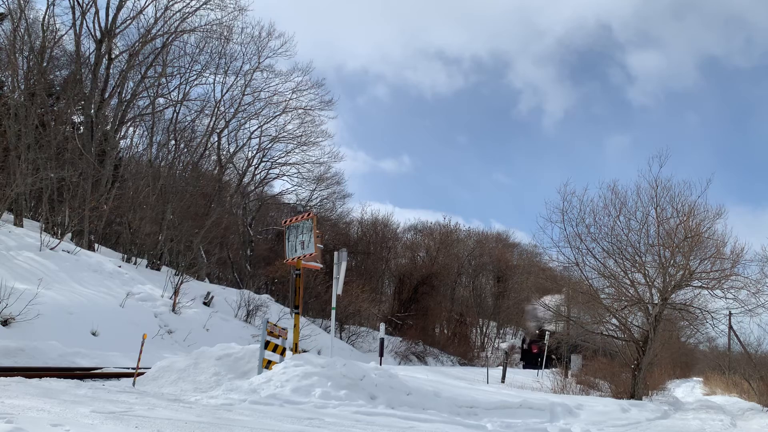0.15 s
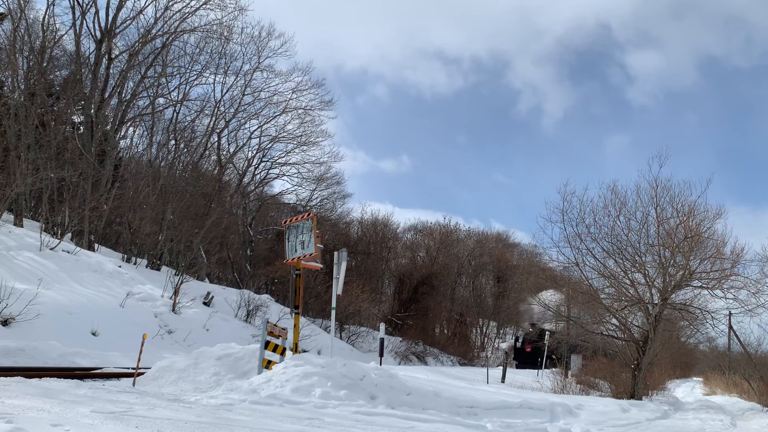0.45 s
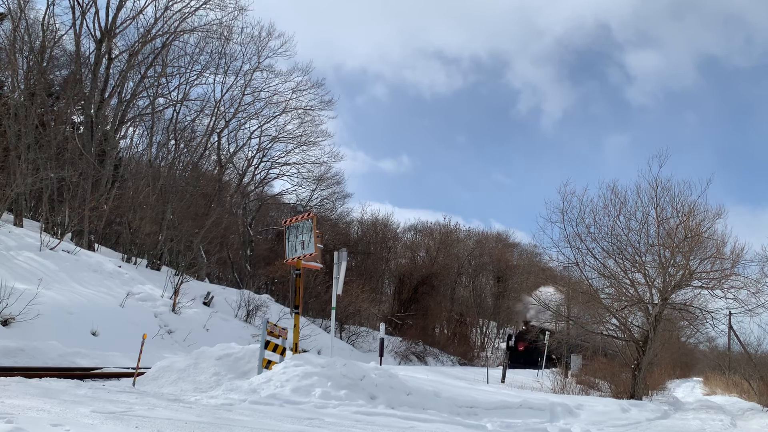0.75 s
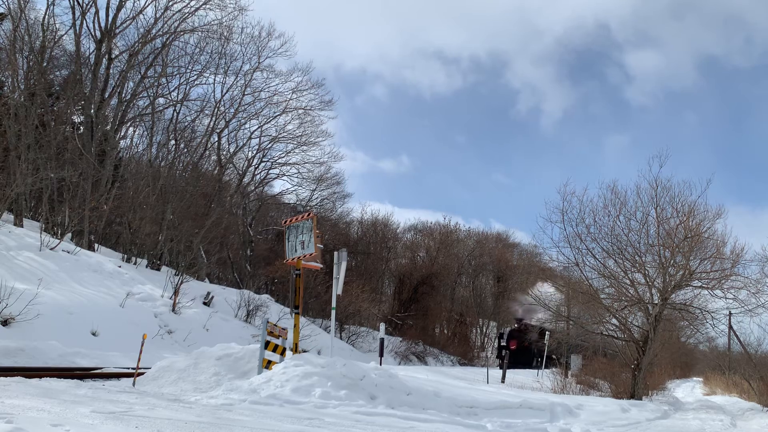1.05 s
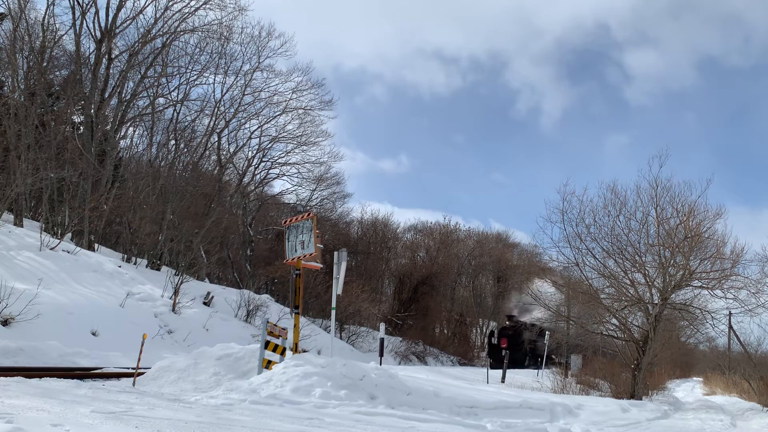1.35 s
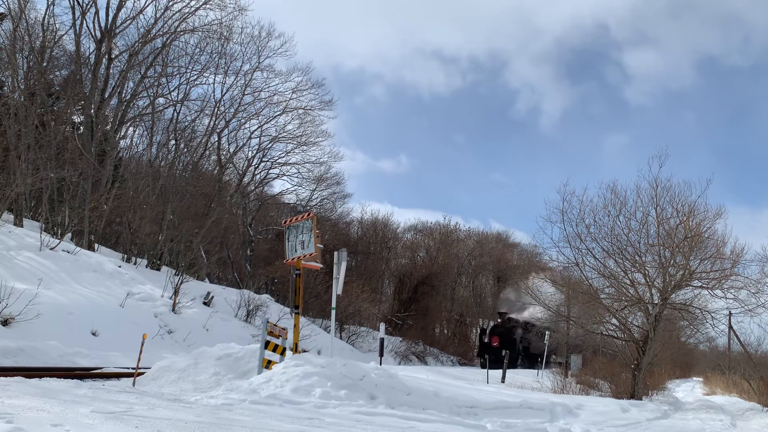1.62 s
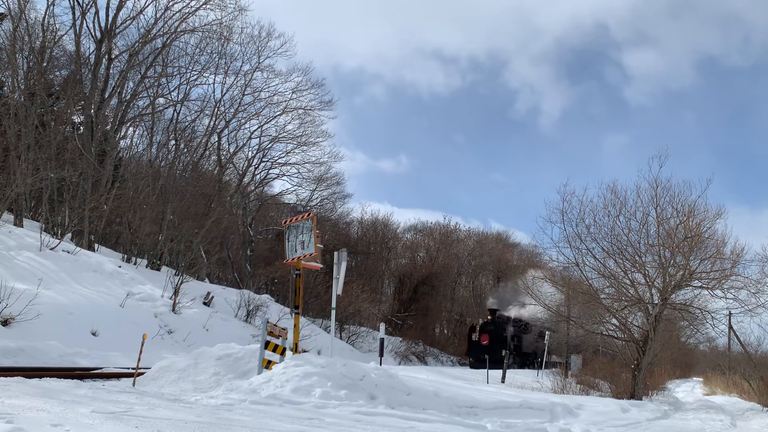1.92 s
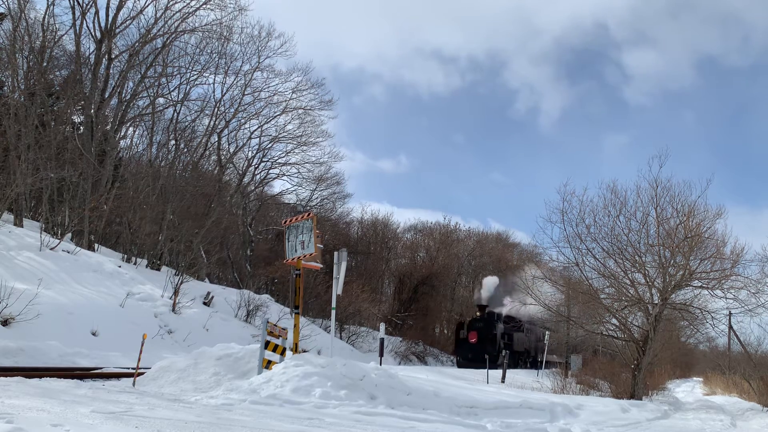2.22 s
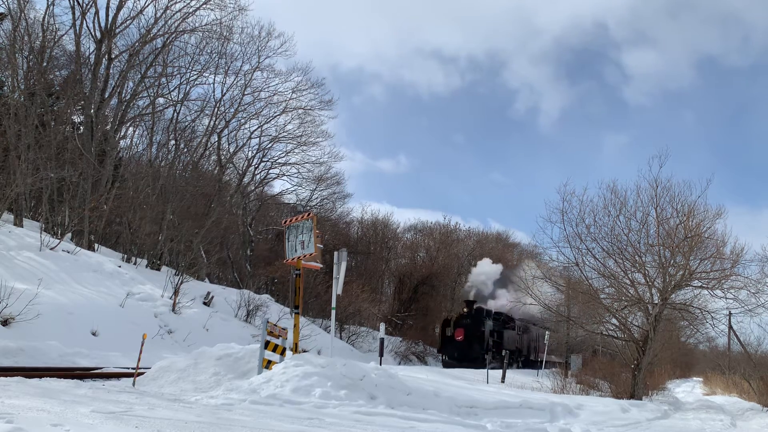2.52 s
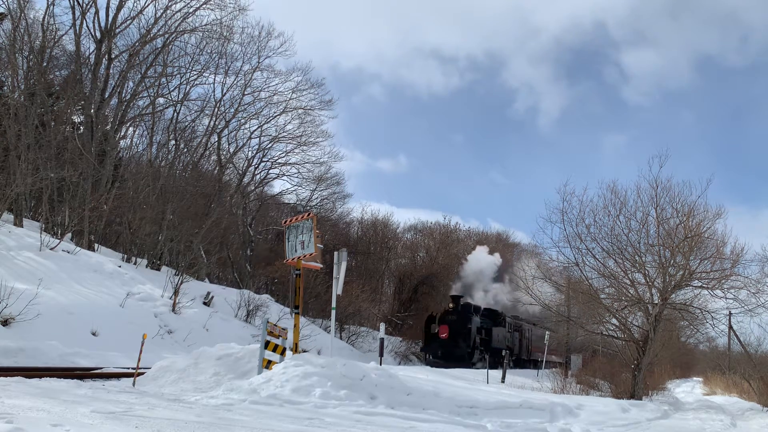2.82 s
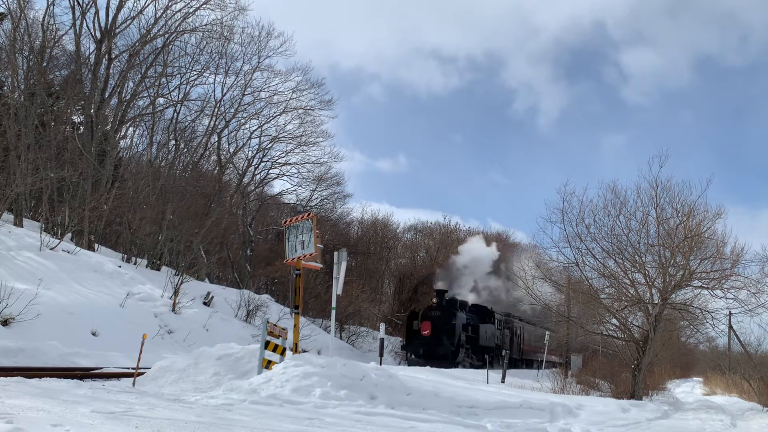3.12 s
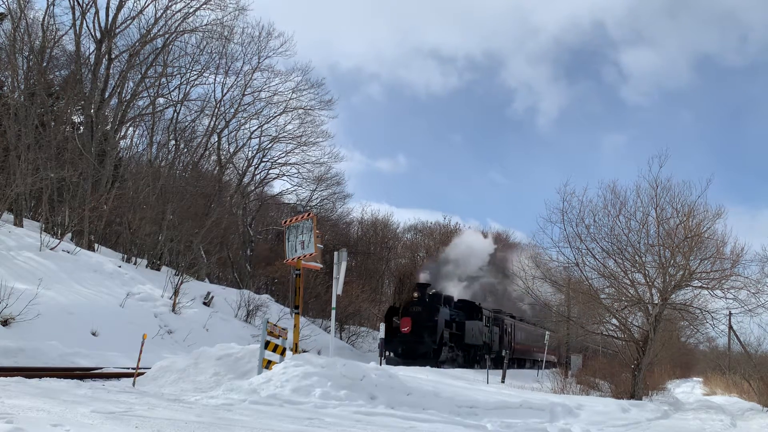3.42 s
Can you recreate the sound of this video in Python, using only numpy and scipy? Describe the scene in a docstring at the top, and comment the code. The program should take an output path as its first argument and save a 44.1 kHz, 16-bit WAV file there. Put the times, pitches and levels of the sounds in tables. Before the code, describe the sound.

A steam locomotive nears in an open snowy valley. Faint exhaust, low hum and weak thumps come first; just before two seconds steam bursts up, then deep uneven chuffs follow, heard from a fixed stereo microphone at a distance.

```python
"""A steam locomotive draws near across snow, heard through two microphone ports.
First the exhaust, steam leaks and rolling wheels are faint noise bands over a low hum, with weak thumps.
Just before two seconds the steam jet leaps up and the exhaust grows louder.
From then on its beats come as deep thumps: short tone bursts of sinking pitch amid swells of resonant noise.
Roar, hiss, rolling and murmur are random spectra, each shaped by a colour and a level curve."""
import sys
import numpy as np
from scipy import signal
from scipy.io import wavfile
from scipy.ndimage import uniform_filter1d

SR = 44100
rng = np.random.default_rng(int(sys.argv[2]) if len(sys.argv) > 2 else 0)


def digitize_waveform(pressure):
    """Quantize a signal to 16-bit integers and store it at the path in sys.argv[1].

    Rows of a 2-D input are taken as channels; values are limited to [-1, 1].
    """
    field = np.atleast_2d(pressure).T
    bounded = np.clip(field, -1, 1)
    quanta = np.round(bounded * 32767).astype(np.int16)
    wavfile.write(sys.argv[1], SR, quanta)


def decibels_to_gain(level_db):
    """Convert a level in decibels to a linear amplitude gain (20 dB per decade)."""
    exponent = np.asarray(level_db, float) / 20
    return 10 ** exponent


N = 156996


def evened(x):
    """Normalisation: scales a signal to an rms of 1."""
    return x / np.sqrt(np.mean(x ** 2) + 1e-20)


def read_spectrum(points, hz):
    """Spectral interpolation: reads a curve on a logarithmic frequency axis."""
    f, value = np.transpose(points)
    return np.interp(np.log(hz + 1), np.log(f + 1), value)


def follow(curve):
    """Amplitude envelope: turns a dB curve into a gain for every sample."""
    s, db = np.transpose(curve)
    return decibels_to_gain(np.interp(np.arange(N) / SR, s, db))


def smoothed(field, bins, frames):
    """Correlated randomness: averages a random field over frequency bins and time frames, to rms 1."""
    across_bins = uniform_filter1d(field, size=bins, axis=0)
    return evened(uniform_filter1d(across_bins, size=frames, axis=1))


# Coherence of the two ports: [f/Hz, likeness 0-1]
PORT_LIKENESS = [(40, 1), (70, 0.93), (100, 1), (150, 0.65), (250, 0.26), (330, 1), (420, 0.89),
                 (650, 0.82), (870, 0.46), (1200, 0.62), (1800, 0.76), (2250, 0.74), (2600, 0.25),
                 (3200, 1), (3900, 0.34), (4600, 0.53), (5300, 0.88), (6400, 0.15), (7200, 0.36),
                 (8000, 0.1), (8600, 0.8), (15000, 1)]
# Phase difference of the ports: [f/Hz, lead of the left port/rad]
PORT_LEAD = [(60, 0), (200, 1.3), (250, 2.6), (265, -2.2), (310, -.9), (420, 0), (870, .4), (1200, -.8),
             (2300, -.6), (3270, -1.7), (4100, -.8), (4650, -1.8), (5340, -2.7), (6030, -3.2), (6720, -4.5),
             (7200, -6.6), (7750, -8.3), (8600, -9.42), (15000, -22)]
# Level difference of the ports: [f/Hz, left minus right/dB]
PORT_TILT = [(60, 0), (350, -2), (600, 0), (870, 2), (1200, 0), (1900, 0), (2600, 6), (3300, 4), (3700, 0),
             (4700, 1), (6000, -4), (7100, 2), (8400, 0), (15000, 0)]


def noise(colour, size, patchy_db, gusty_db, raspy_db):
    """Partly coherent noise: random short-time spectra with drifting patches, gusts and narrow rasps."""
    hop = size // 4
    frames, hz = N // hop + 5, np.fft.rfftfreq(size, 1 / SR)
    a, b, c, d, patches, rasps = rng.standard_normal((frames, len(hz), 6)).T
    patches = smoothed(patches, bins=10, frames=8)
    rasps = smoothed(rasps, bins=2, frames=12)
    gusts = evened(uniform_filter1d(rng.standard_normal(frames), size=6))  # shared by all frequencies

    same = np.clip(read_spectrum(PORT_LIKENESS, hz), 0, 1)[:, None]
    one, other = a + 1j * b, c + 1j * d
    spectra = np.array([one, same * one + np.sqrt(1 - same ** 2) * other])

    # each port takes half of the level and phase difference
    lead = np.interp(hz, *np.transpose(PORT_LEAD))
    left = decibels_to_gain(read_spectrum(PORT_TILT, hz) / 2) * np.exp(.5j * lead)
    spectra *= np.array([left, 1 / left])[:, :, None]

    unevenness = patchy_db * patches + gusty_db * gusts + raspy_db * rasps
    spectra *= decibels_to_gain(read_spectrum(colour, hz)[:, None] + unevenness)
    return evened(signal.istft(spectra, nperseg=size, noverlap=size - hop)[1][:, :N])


def bell(t, width):
    """Asymmetric Gaussian envelope: a swell that rises faster than it dies."""
    tail = 1.24  # stretches the fall and shortens the rise
    return .5 ** ((2 * t / (width * np.where(t > 0, tail, 1 / tail))) ** 2)


def bursts(rows):
    """Tone-burst principle: a few cycles of linearly sinking pitch under one swell."""
    sag_hz_per_s, tilt_db = 200, 2  # pitch lost per second, left minus right
    out = np.zeros(N)
    for (s, db, hz, width), turn in zip(rows, rng.random(len(rows))):
        since = np.arange(N) / SR - s
        t = np.clip(since, -.12, .12)  # keeps the sweep near its centre
        cycles = t * (hz - sag_hz_per_s * t / 2) + turn
        out += decibels_to_gain(db) * bell(since, width) * np.cos(2 * np.pi * cycles)
    return out * decibels_to_gain(tilt_db / 2 * np.array([[1], [-1]]))


# Level of the open-air murmur: [t/s, level/dB]
MURMUR_LEVEL = [(0, -56.5), (.8, -56.5), (1.8, -54.5), (2.3, -61), (2.8, -55), (3.1, -48), (3.56, -52.5)]
# Relative power density of the murmur: [f/Hz, density/dB]
MURMUR_COLOUR = [(60, -30), (130, -8.5), (220, 0), (320, -12), (600, -35), (1000, -23), (3000, -56)]


def air():
    """Ambient noise: a low broadband murmur of the open valley."""
    return follow(MURMUR_LEVEL) * noise(MURMUR_COLOUR, size=2048, patchy_db=1.0, gusty_db=0.3, raspy_db=1.5)


# Rms level of the hum before its waver: [t/s, level/dB]
HUM_LEVEL = [(0, -36.5), (.6, -33.5), (.8, -38), (1.04, -36.5), (1.13, -35), (1.155, -29), (1.19, -34),
             (1.6, -33), (2.2, -30), (2.9, -32), (3.3, -29.5), (3.56, -30.5)]


def hum():
    """Amplitude modulation: one low tone of constant pitch, wavering slightly in level."""
    pitch_hz, lead_rad, waver_db = 95.04, 0.59, 0.8  # the left port leads; the waver is an rms
    t = np.arange(N) / SR
    waver = evened(sum(np.sin(2 * np.pi * (f * t + rng.random())) for f in np.geomspace(1, 9, num=12)))
    phase = 2 * np.pi * (pitch_hz * t + rng.random()) + lead_rad / 2 * np.array([[1], [-1]])
    return np.sqrt(2) * follow(HUM_LEVEL) * decibels_to_gain(waver_db * waver) * np.sin(phase)


# Level of the ground rumble of the train: [t/s, level/dB]
RUMBLE_LEVEL = [(0, -38.5), (.3, -49.5), (.7, -43), (.87, -46), (1.0, -40.5), (1.2, -42), (1.3, -47),
                (1.6, -38.5), (1.93, -43.5), (2.0, -42), (2.2, -36), (2.36, -38.5), (2.6, -34.5),
                (2.95, -36), (3.25, -39), (3.56, -33)]
# Relative power density of the rumble: [f/Hz, density/dB]
RUMBLE_COLOUR = [(15, -39), (33, -18), (42, -0.5), (62, 1), (76, -1), (95, -11), (120, 0), (135, -18.5),
                 (170, -25.5), (300, -45.5)]


def ground_rumble():
    """Ground-borne vibration: low-frequency noise of the train's rumble."""
    return follow(RUMBLE_LEVEL) * noise(RUMBLE_COLOUR, size=2048, patchy_db=0.2, gusty_db=1.0, raspy_db=0.0)


# Level of the wheels on the rails, before a 0.3 dB lift: [t/s, level/dB]
ROLLING_LEVEL = [(0.0, -45.5), (0.07, -47), (0.21, -51.5), (0.23, -48.5), (0.8, -53.5), (1.23, -49),
                 (1.45, -54.5), (1.61, -49), (1.66, -53.5), (1.94, -54), (1.96, -46), (2.14, -55),
                 (2.17, -44), (2.84, -44), (2.85, -43.5), (2.99, -50), (3.03, -43.5), (3.37, -50.5),
                 (3.53, -46), (3.56, -45)]
# Relative power density of the rail noise: [f/Hz, density/dB]
RAIL_COLOUR = [(200, -58), (300, -13.5), (410, -7.5), (480, -4), (600, -3), (670, 0), (740, -7.5),
               (900, -9), (1500, -44)]


def wheels():
    """Rolling contact noise: wheels sound in the rails as a mid-frequency noise band."""
    rails = noise(RAIL_COLOUR, size=1024, patchy_db=1.0, gusty_db=0.56, raspy_db=1.0)
    return decibels_to_gain(0.3) * follow(ROLLING_LEVEL) * rails


# Level of the thinnest, highest hiss, before a 3.5 dB lift: [t/s, level/dB]
SIZZLE_LEVEL = [(0.0, -60), (0.01, -67), (0.39, -70), (1.02, -64), (1.06, -62), (1.11, -65.5), (2.15, -61),
                (2.26, -52), (2.58, -58.5), (2.92, -56), (2.97, -50.5), (3.02, -57), (3.42, -54.5),
                (3.48, -46.5), (3.53, -54), (3.56, -53)]
# Relative power density of the sizzle: [f/Hz, density/dB]
SIZZLE_COLOUR = [(5000, -39), (8000, -2.5), (9500, -1), (12000, -5), (14000, -4.5), (16000, -3)]


def sizzle():
    """Fine-scale turbulence: escaping steam as a thin high noise band."""
    thin = noise(SIZZLE_COLOUR, size=256, patchy_db=-0.5, gusty_db=-1.6, raspy_db=2.0)
    return decibels_to_gain(3.5) * follow(SIZZLE_LEVEL) * thin


# Level of steam escaping at the valves, before a 5 dB lift: [t/s, level/dB]
LEAK_LEVEL = [(0.0, -58), (0.02, -60.5), (0.28, -72.5), (0.5, -64.5), (0.67, -67), (0.78, -73.5),
              (1.23, -63), (1.26, -68.5), (1.5, -56), (1.54, -62.5), (1.95, -63), (1.965, -50),
              (2.15, -58.5), (2.23, -54.5), (2.5, -54.5), (2.79, -62.5), (2.96, -54), (3.34, -61),
              (3.43, -55), (3.48, -43.5), (3.55, -60), (3.56, -49)]
# Relative power density of the hiss: [f/Hz, density/dB]
HISS_COLOUR = [(2500, -49), (4500, -1), (5500, 4), (7500, 0), (9000, -4), (11000, -19), (16000, -42)]


def valve_leak():
    """Leak turbulence: steam at the valves hisses as a treble noise band."""
    hiss = noise(HISS_COLOUR, size=512, patchy_db=1.5, gusty_db=0.5, raspy_db=2.0)
    return decibels_to_gain(5.0) * follow(LEAK_LEVEL) * hiss


# Level of the steam jet from the cylinders, before a 2 dB lift: [t/s, level/dB]
JET_LEVEL = [(0.0, -58), (0.16, -60), (0.19, -69), (0.36, -65), (0.38, -58.5), (0.62, -56.5), (0.8, -66.5),
             (1.09, -60.5), (1.11, -58.5), (1.23, -58), (1.26, -76), (1.31, -58), (1.61, -55.5),
             (1.62, -56), (1.64, -55.5), (1.85, -56), (1.89, -55), (1.948, -58), (1.965, -42.5),
             (2.07, -44.5), (2.16, -49.5), (2.22, -44.5), (2.43, -48), (2.49, -43.5), (2.64, -49.5),
             (2.65, -50), (2.87, -49), (2.89, -44.5), (2.91, -53.5), (3.14, -44.5), (3.17, -50),
             (3.21, -45), (3.28, -48.5), (3.56, -47)]
# Relative power density of the jet: [f/Hz, density/dB]
JET_COLOUR = [(1200, -12.5), (2400, -21), (2900, -1), (3300, -2), (3900, 1.5), (4400, -3), (5200, -4.5),
              (7500, -20), (12000, -46)]


def steam_jet():
    """Jet noise: steam from the cylinders as an upper-mid noise band."""
    spray = noise(JET_COLOUR, size=1024, patchy_db=1.0, gusty_db=0.8, raspy_db=2.0)
    return decibels_to_gain(2.0) * follow(JET_LEVEL) * spray


# Resonant noise swells, puffs of steam and two early rail tones near 580 Hz:
# [centre t/s, level/dB, resonance f/Hz, nominal swell width/s]
SWELL_EVENTS = [(.06, -54, 1800, .06), (0.129, -46, 1880, 0.028), (0.549, -58, 1710, .02),
                (.07, -50, 586, 0.089), (.55, -57, 578, .3), (1.11, -55, 2000, 0.027),
                (1.39, -47, 1900, 0.037), (1.62, -47.5, 1940, 0.034), (1.621, -51, 2980, 0.024),
                (1.975, -45, 3900, .04), (2.0, -51, 1930, .05), (2.052, -45, 3960, 0.036),
                (2.28, -54, 1800, 0.042), (2.3, -55, 3600, 0.084), (2.48, -42, 1450, 0.12),
                (2.491, -47, 3880, 0.076), (2.54, -57, 3570, .04), (2.86, -46, 1900, .04),
                (3.06, -43, 1920, .04)]


def resonant_swells():
    """Resonant filtering: puffs of steam and two early rail tones, slightly late at the left port."""
    sharpness, same = 7.5, 0.7  # Q of each of two filter passes, likeness of the ports
    out, t = np.zeros((2, N)), np.arange(-SR // 5, SR // 5) / SR
    for s, db, hz, width in SWELL_EVENTS:
        one, other = rng.standard_normal((2, len(t)))
        late = np.roll(one, shift=3)  # samples
        pair = [late, same * one + np.sqrt(abs(1 - same ** 2)) * other]
        b, a = signal.iirpeak(hz, sharpness, SR)
        ringing = signal.lfilter(b, a, signal.lfilter(b, a, pair))
        swell = decibels_to_gain(db) * bell(t, width) * evened(ringing)
        at = np.round((s + t) * SR).astype(int)
        keep = (at >= 0) & (at < N)
        out[:, at[keep]] += swell[:, keep]
    return out


# Short knocks and two brief squeaks, level as the mean of the ports:
# [centre t/s, peak level/dB, f at the centre/Hz, nominal swell width/s]
KNOCK_EVENTS = [(.067, -33, 136, 0.018), (.125, -37.5, 161, 0.015), (.14, -41.5, 220, 0.013),
                (.42, -40.5, 162, 0.016), (.455, -42.5, 140, .015), (1.157, -33, 160, 0.013),
                (1.968, -28, 115, 0.015), (1.97, -41.5, 628, 0.03), (1.972, -41.5, 223, 0.023),
                (2.44, -56, 6140, .07), (2.572, -44.5, 4250, 0.024), (3.069, -41.5, 220, 0.0094)]


def knocks():
    """Transient excitation: knocks and squeaks as short tone bursts."""
    return bursts(KNOCK_EVENTS)


# Exhaust beats, each a few cycles of deep pressure, level as the mean of the ports:
# [centre t/s, peak level/dB, f at the centre/Hz, nominal swell width/s]
BEAT_EVENTS = [(.155, -26, 70.6, 0.02), (.25, -26, 70.6, 0.022), (.425, -25.5, 73, 0.012),
               (.45, -38, 56.6, 0.047), (.63, -34, 58, 0.068), (1.51, -28, 52.4, 0.03),
               (1.972, -24.5, 67, 0.042), (2.01, -29, 51, .05), (2.04, -29, 74, 0.018),
               (2.261, -14, 66, 0.026), (2.338, -39, 65, 0.017), (2.392, -39, 61, 0.025),
               (2.466, -15, 56, 0.026), (2.555, -24.5, 77, 0.024), (2.595, -29, 50, 0.051),
               (2.709, -13.5, 60, 0.0365), (2.765, -34, 62, 0.017), (2.81, -30, 60, .02),
               (2.865, -20, 68.5, 0.028), (2.905, -23.5, 53, 0.028), (3.058, -17, 68.7, 0.03),
               (3.317, -32, 60, 0.027), (3.458, -17.5, 70, 0.023), (3.49, -22.5, 62, 0.03)]


def thumps():
    """Pressure pulses: exhaust beats as deep tone bursts."""
    return bursts(BEAT_EVENTS)


# Level of the draught up the chimney, before a 2.5 dB lift: [t/s, level/dB]
DRAUGHT_LEVEL = [(0.0, -47.5), (0.15, -48), (0.19, -54.5), (0.24, -51), (0.35, -55.5), (0.37, -49.5),
                 (0.55, -50), (0.56, -45), (0.76, -53.5), (1.06, -51), (1.08, -55), (1.11, -44.5),
                 (1.28, -53.5), (1.3, -46.5), (1.57, -47), (1.63, -44), (1.69, -49), (1.9, -43.5),
                 (1.93, -48), (1.95, -42.5), (2.05, -39.5), (2.08, -46), (2.13, -39), (2.14, -45),
                 (2.23, -39.5), (2.72, -42), (2.84, -42.5), (2.85, -38), (2.95, -44), (3.04, -41),
                 (3.34, -44), (3.38, -39), (3.47, -42.5), (3.56, -41)]
# Relative power density of the roar: [f/Hz, density/dB]
ROAR_COLOUR = [(150, -2.5), (275, -15.5), (400, -5.5), (660, -11), (900, -10.5), (1050, -4), (1190, -9),
               (1310, -2.5), (1600, -3), (1940, -1.5), (2350, -6), (2650, -10.5), (3300, -16), (5000, -43),
               (15000, -53)]


def exhaust():
    """Turbulent mixing noise: the roar of the blast."""
    roar = noise(ROAR_COLOUR, size=1024, patchy_db=0.5, gusty_db=1.12, raspy_db=2.5)
    return decibels_to_gain(2.5) * follow(DRAUGHT_LEVEL) * roar


def scene():
    """Linear superposition: the pressures of all sources add."""
    background = air() + hum() + ground_rumble() + wheels()
    steam = sizzle() + valve_leak() + steam_jet()
    return background + steam + resonant_swells() + knocks() + thumps() + exhaust()


# Edge below which both channels carry the same sound; it falls over time, so the bass widens: [t/s, f/Hz]
MONO_EDGE = [(0, 280), (.7, 310), (.85, 332), (.97, 260), (1.17, 334), (1.32, 278), (1.47, 340),
             (1.65, 260), (2.0, 205), (2.3, 150), (2.55, 120), (2.65, 97), (2.95, 96), (3.15, 60),
             (3.56, 45)]


def mono_bass(left, right):
    """Mid-side filtering: takes the low end out of the difference of the channels."""
    mid, side = (left + right) / 2, (left - right) / 2
    hz, t, spectra = signal.stft(side, SR, nperseg=4096, noverlap=3072)
    above = (hz[:, None] - np.interp(t, *np.transpose(MONO_EDGE))) / 13  # 13 Hz sets the softness
    passed = (1 + np.tanh(above)) / 2
    side = signal.istft(spectra * passed, SR, nperseg=4096, noverlap=3072)[1][:N]
    return np.array([mid + side, mid - side])


def top_cut(x):
    """Nothing passes above the cut-off."""
    return signal.sosfilt(signal.butter(12, 15630, fs=SR, output="sos"), x)


def record(dry):
    """High-pass response: the microphone drops the deepest bass, and the low end stays mono below a falling
    edge."""
    cut = signal.butter(4, 37, "high", fs=SR, output="sos")  # Hz, run forwards and backwards
    left, right = signal.sosfiltfilt(cut, dry)
    return top_cut(mono_bass(left, right))


dry = scene()
out = record(dry)
digitize_waveform(out)
```